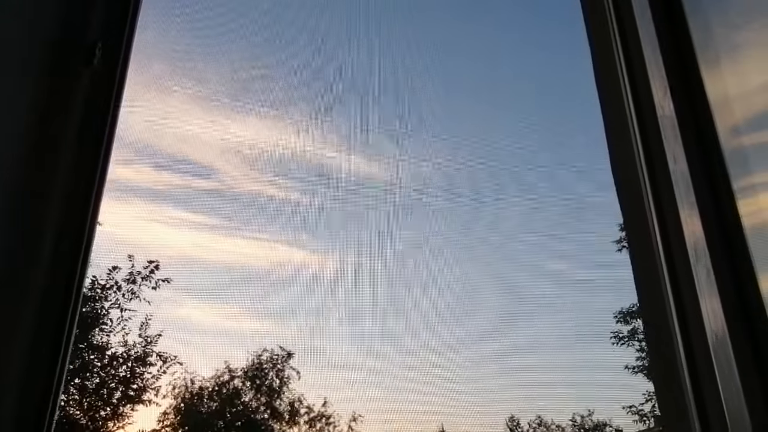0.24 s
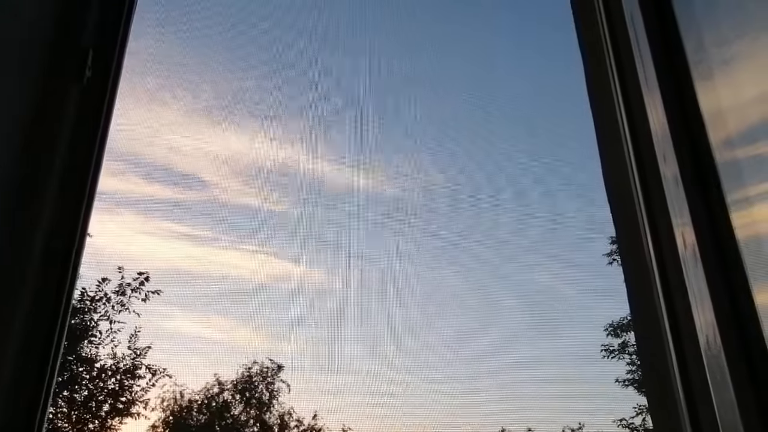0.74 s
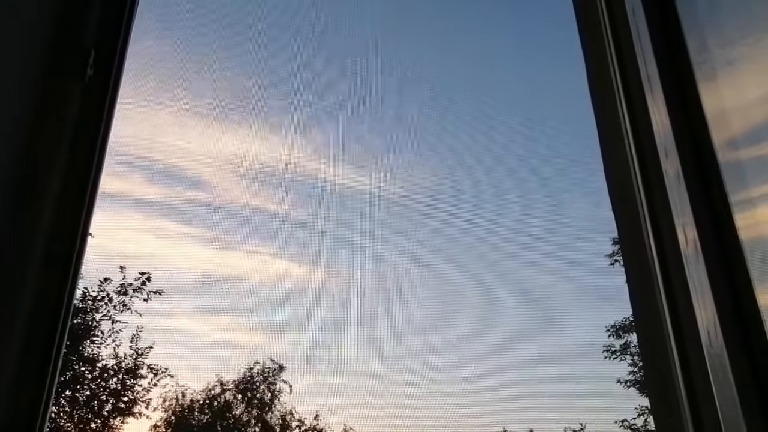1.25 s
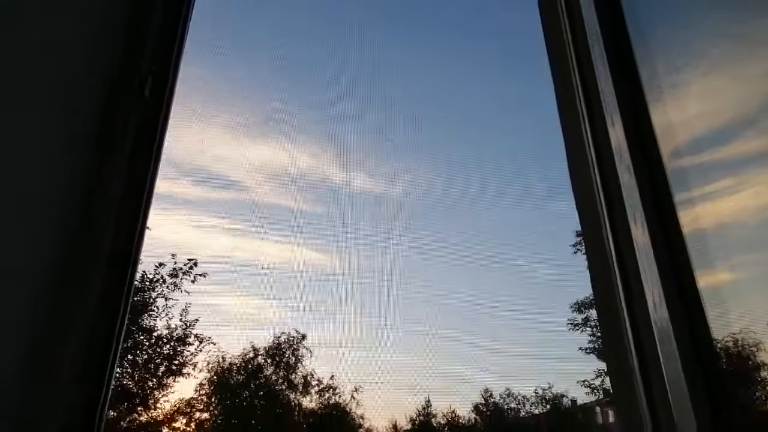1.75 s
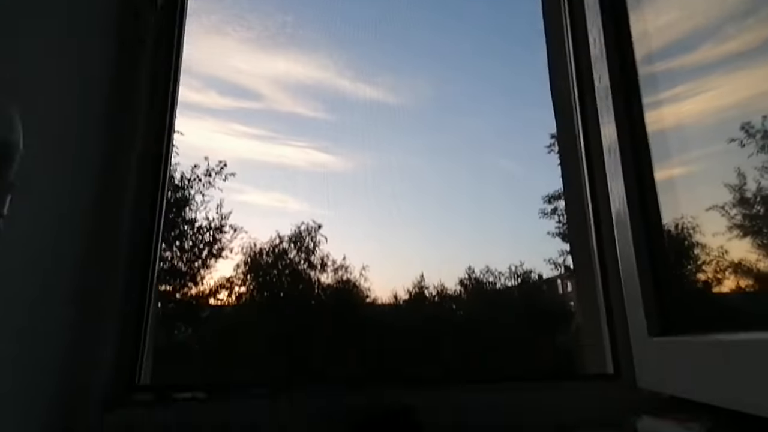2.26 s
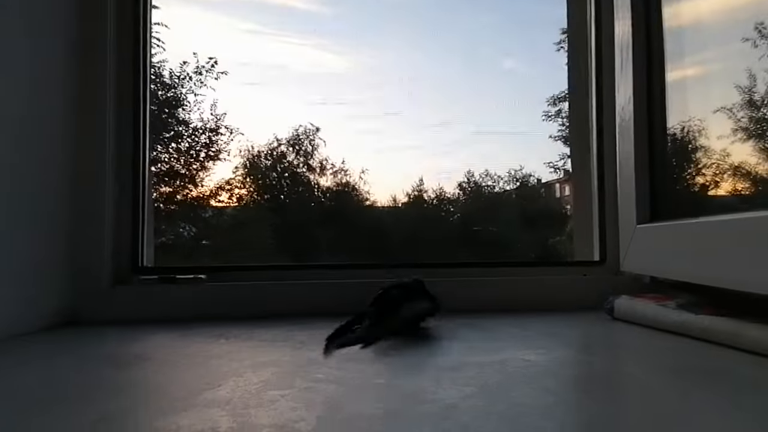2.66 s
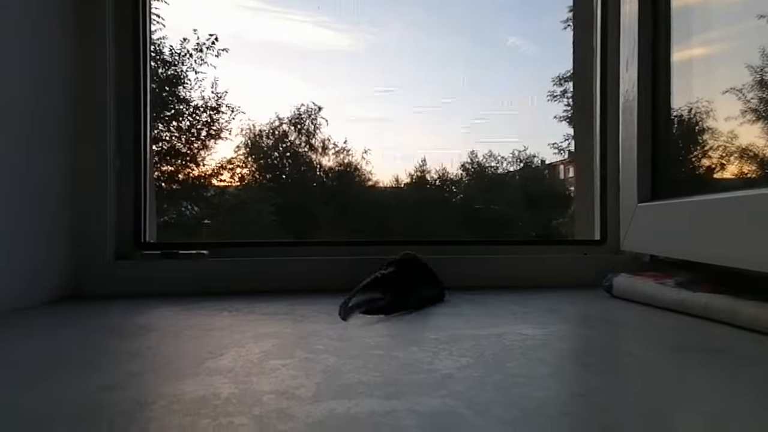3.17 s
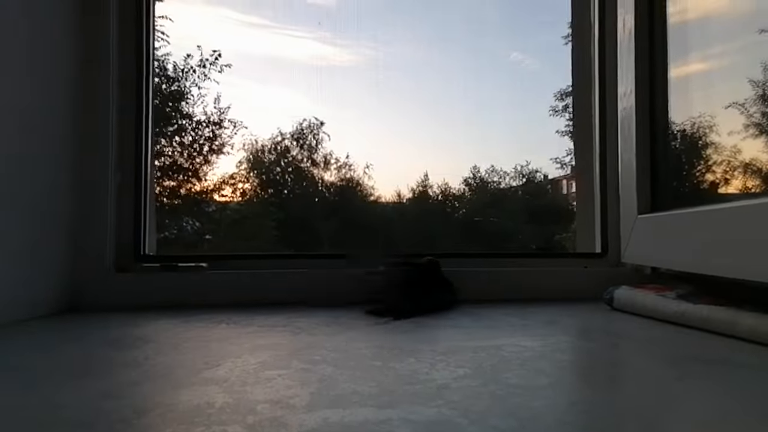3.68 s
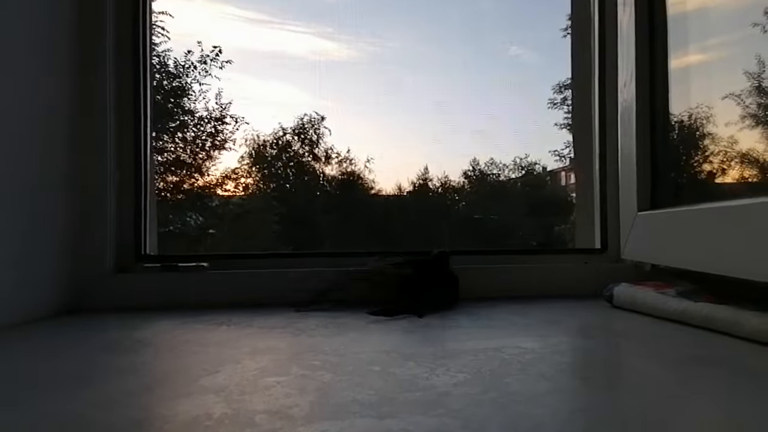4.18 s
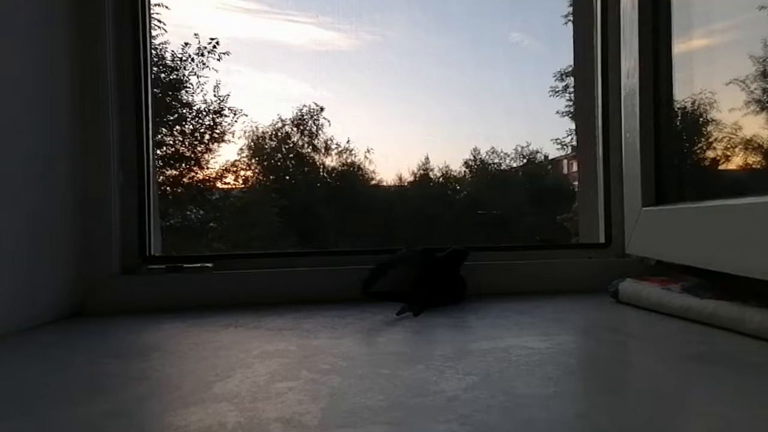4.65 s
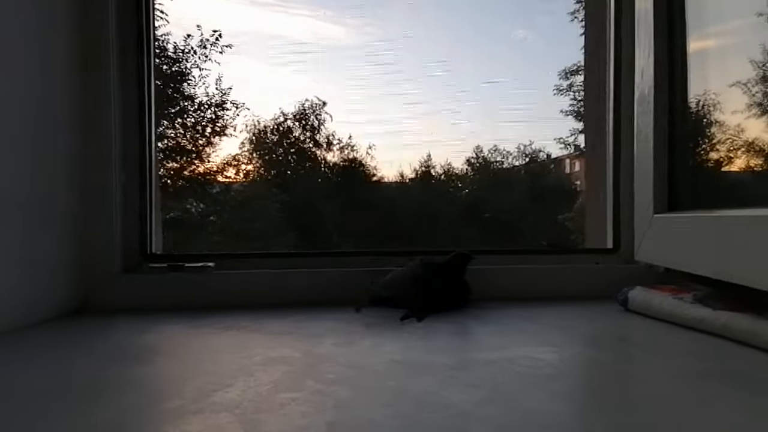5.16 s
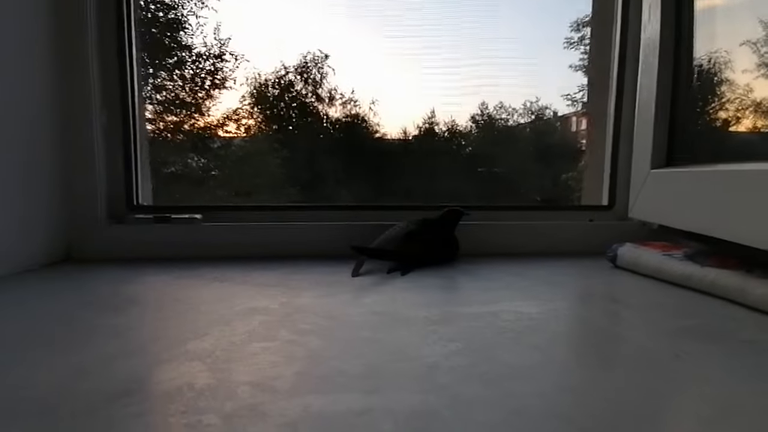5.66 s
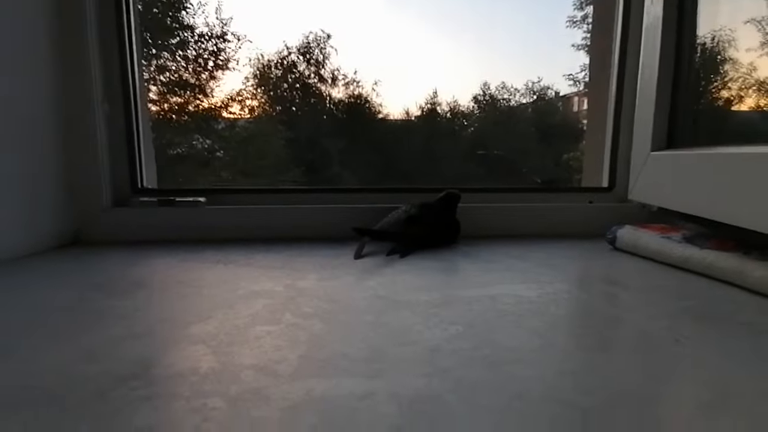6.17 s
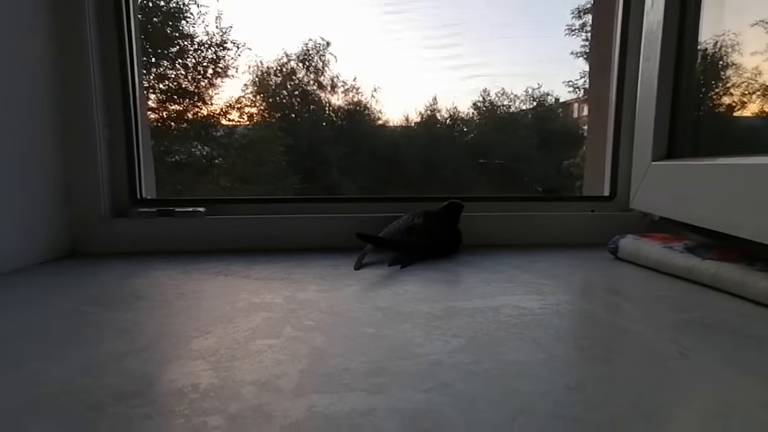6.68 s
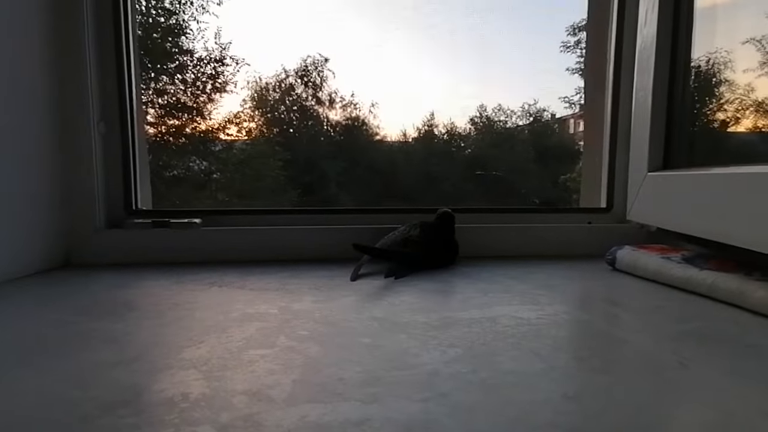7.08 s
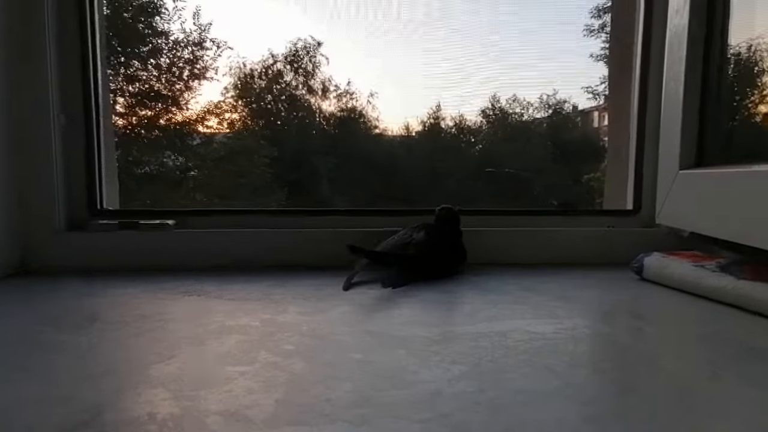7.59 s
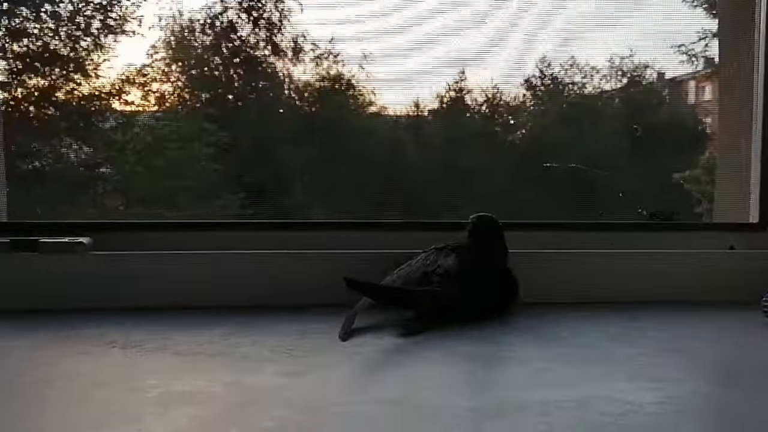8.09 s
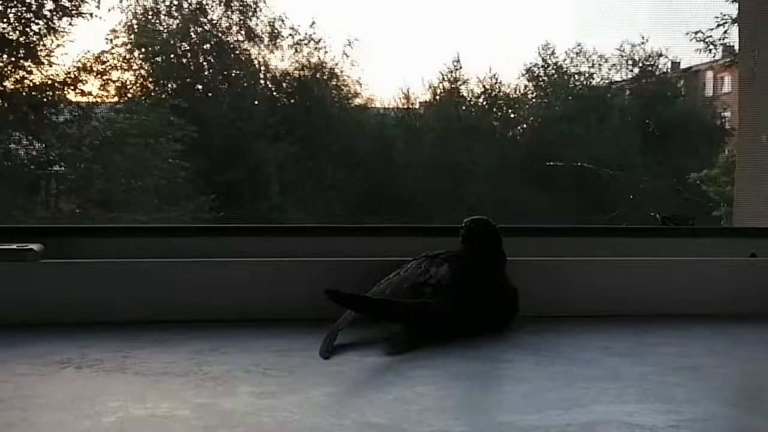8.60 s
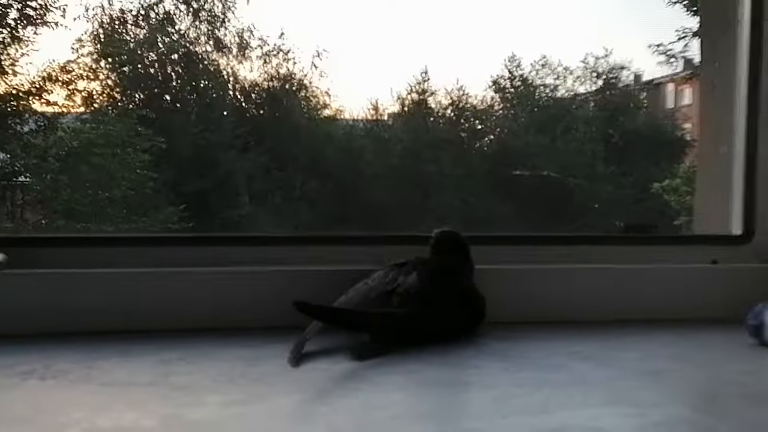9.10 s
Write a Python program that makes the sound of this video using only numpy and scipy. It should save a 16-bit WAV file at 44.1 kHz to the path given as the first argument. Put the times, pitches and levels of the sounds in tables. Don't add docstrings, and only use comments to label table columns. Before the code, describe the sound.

Swifts scream shrilly past an open window in overlapping high whistles, while a grounded bird scuffles on the sill over faint low town hum.

```python
import sys
import numpy as np
from scipy import signal
from scipy.fft import rfft, irfft, next_fast_len
from scipy.io import wavfile
from scipy.ndimage import uniform_filter1d, map_coordinates

SR = 44100
rng = np.random.default_rng(int(sys.argv[2]) if len(sys.argv) > 2 else 0)


def dump_mix(stems):
    frames = np.atleast_2d(stems).T
    limited = np.clip(frames, -1, 1)
    pcm = np.round(limited * 32767).astype(np.int16)
    wavfile.write(sys.argv[1], SR, pcm)


def makeup_ratio(level_db):
    decades = np.asarray(level_db, float) / 20
    return 10 ** decades


N = 411894


def unit(x):
    return x / np.sqrt(np.mean(np.abs(x) ** 2) + 1e-20)


def along(points, hz):
    f, v = np.transpose(points)
    return np.interp(np.log(hz + 1), np.log(f + 1), v)


def curves(rows):
    s, *cols = np.transpose(rows)
    return [np.interp(np.arange(N) / SR, s, c) for c in cols]


def wobble(rate, size=N):
    knots = rng.standard_normal(int(size * rate / SR) + 4)
    return map_coordinates(knots, [np.arange(size) * rate / SR])


def filtered(x, response):
    m = next_fast_len(N + SR // 2)
    return irfft(rfft(x, m) * response(np.fft.rfftfreq(m, 1 / SR)), m)[..., :N]


def sides(db):
    g = makeup_ratio(np.array([db / 2, -db / 2]))
    return g / np.sqrt(np.mean(g ** 2, axis=0))


def band(centre_hz, width_hz):
    return lambda hz: np.exp(-.5 * ((hz - centre_hz) / width_hz) ** 2)


# (frequency [Hz], level [dB per Hz])
TOWN_COLOUR = [(30, -10.5), (60, -20), (100, -6.5), (200, -14.5), (434, -16), (740, -24), (1500, -29.5),
               (2000, -31), (2900, -36), (3700, -42.5), (4300, -43), (7500, -38), (9100, -44),
               (14700, -44.5), (16000, -39)]
# (time [s], level [dB])
TOWN_LEVEL = [(0.0, -63.5), (1.61, -64.5), (8.3, -63), (8.6, -63), (9.34, -62.5)]
# (frequency [Hz], likeness [-1 to 1])
TOWN_LIKENESS = [(40, 0.36), (90, 0.58), (290, 0.97), (640, 0.46), (1400, -0.27), (4000, 0.24),
                 (15000, -0.12)]
# (frequency [Hz], left-right difference [dB])
TOWN_LEAN = [(30, -1), (100, 9.5), (400, 1.5), (700, 4.5), (2400, 0.5), (15000, 3)]


def traffic():
    def mix(hz):
        turn = np.arccos(np.clip(along(TOWN_LIKENESS, hz), -1, 1)) / 2
        return makeup_ratio(along(TOWN_COLOUR, hz)) * [np.cos(turn), np.sin(turn)]

    mid, side = filtered(rng.standard_normal((2, N)), mix)
    hiss = unit(filtered(np.array([mid + side, mid - side]), lambda hz: sides(along(TOWN_LEAN, hz))))
    return makeup_ratio(curves(TOWN_LEVEL)[0] + 4.5 + .8 * wobble(3.3)) * hiss


# (time [s], low drone level [dB], high drone level [dB])
DRONE_LEVELS = [(0, -64, -67), (1.602, -67.5, -69.5), (2.3, -56.5, -66.5), (3.3, -60.5, -56),
                (4.0, -63, -63), (4.601, -59.5, -54.5), (5.4, -59.5, -60), (6.2, -52, -60.5),
                (6.9, -61, -66.5), (7.8, -51, -69), (8.6, -59, -67.5), (9.3, -51.5, -79)]


def drones():
    t, out = np.arange(N) / SR, 0
    for hz, db in zip((91, 129), curves(DRONE_LEVELS)):
        tone = np.sqrt(2) * np.sin(2 * np.pi * hz * t + 1.73 * wobble(3))
        blur = unit(filtered(rng.standard_normal(N), band(hz, 19.0)))
        out = out + makeup_ratio(db) * (0.88 * tone + 0.36 * blur)
    return sides(4.5)[:, None] * out


# (time [s], left-right difference [dB])
BEARING = [(0, -7), (.45, -10), (.6, 8), (.75, -10.5), (1.6, -18), (2.0, -2), (2.5, -10), (3.0, -20),
           (3.4, -11), (3.9, -21), (4.2, -21), (4.8, -1), (5.5, -1.5), (5.9, 8), (6.3, 14), (7.2, -1),
           (8.0, 4.5), (9.3, -7)]


def bearing_db(at):
    return np.interp(at, *np.transpose(BEARING))


# (time [s], level [dB])
FLOCK_LEVEL = [(0, -60), (.9, -44), (2, -43), (3.3, -58), (4.5, -47), (5.85, -70), (6.3, -46), (6.6, -54.5),
               (7.1, -47.5), (8.9, -52.5), (9.34, -56)]
# (middle time [s], half length [s], centre [Hz], level [dB])
HIGH_VOICES = [
    (0, 0.18, 6560, -55),
    (0.69, 0.18, 6800, -69.5),
    (1.38, 0.15, 6150, -49.5),
    (1.58, 0.045, 6400, -52.5),
    (4.888, 0.089, 6800, -71),
    (6.427, 0.29, 6030, -54.5),
    (6.744, .16, 6730, -63.5),
    (7.66, 0.15, 6300, -63),
    (8.714, 0.086, 6260, -62),
]


def flock():
    t = np.arange(N) / SR
    flutter = makeup_ratio(2.4 * wobble(140) + 1.6 * wobble(45))

    def voices(shape):
        hiss = filtered(rng.standard_normal((2, N)), shape)
        return unit(hiss * np.roll(flutter, rng.integers(N)))

    out = makeup_ratio(curves(FLOCK_LEVEL)[0] - 12.0) * voices(band(5476, 457))
    for s, half, hz, db in HIGH_VOICES:
        out = out + makeup_ratio(db) * np.exp(-((t - s) / half) ** 4) * voices(band(hz, 460))
    return sides(bearing_db(t) * 0.32) * out


def walls(x):
    t = np.arange(SR // 2) / SR
    decay = makeup_ratio(-60 * t / .07) + makeup_ratio(-12 - 60 * t / .4)
    tail = rng.standard_normal((2, len(t))) * decay * (t > .003)
    return signal.fftconvolve(x, tail / np.linalg.norm(tail[0]), axes=1)[:, :N]


# (frequency [Hz], level [dB per Hz])
FEATHER_COLOUR = [
    [(1000, -26.5), (2500, -15.5), (3700, -18), (6500, -14), (8500, 2.5), (10500, -8.5), (13000, -20),
     (16000, -18)],
    [(1000, -25), (3500, -19), (5500, -3), (7200, 3), (9500, -15), (12500, -13), (14500, -9), (16000, -20)],
]


def sill_colour(hz):
    return makeup_ratio(np.array([along(port, hz) for port in FEATHER_COLOUR]))


def effort(rows):
    t, levels = np.arange(N) / SR, []
    for s, db, rise, fall in rows:
        before = t < s
        steepness = np.where(before, 1.36, 0.82)
        levels.append(db - 20 * np.abs((t - s) / np.where(before, rise, fall)) ** steepness)
    return np.max(levels, axis=0)


# (strongest time [s], level [dB], rise over 20 dB [s], fall over 20 dB [s])
WING_STROKES = [(1.581, -61, 0.061, 0.29), (1.756, -59, 0.045, 0.12), (1.931, -46.5, 0.056, 0.12),
                (2.19, -62.5, 0.15, 0.07), (2.435, -71.5, 0.22, 0.28), (2.5, -68.5, .2, 0.84),
                (2.7, -51, 0.052, .14), (2.8, -63, .1, .04), (2.92, -74, 0.18, 0.055),
                (3.07, -78, 0.31, 0.52), (3.175, -54, 0.034, 0.081), (3.33, -70.5, 0.37, 0.12),
                (1.38, -73, 0.065, 0.36), (1.505, -65.5, 0.022, 0.18), (3.422, -63, 0.052, 0.43),
                (3.78, -60, 0.06, 0.073), (3.705, -50, 0.048, 0.083), (4.066, -57.5, 0.0065, 0.088),
                (4.146, -60.5, 0.14, 0.16), (4.21, -61.5, .1, 0.036), (5.535, -79, .02, .08),
                (6.1, -75, 0.033, .1)]
# (strongest time [s], level [dB], rise over 20 dB [s], fall over 20 dB [s])
BREAST_SCRAPES = [
    (1.59, -72, 0.037, 0.21),
    (1.94, -93, .05, .1),
    (2.44, -61, 0.022, 0.052),
    (2.7, -89, 0.042, 0.17),
    (3.165, -64, .025, .12),
    (3.27, -68.5, 0.11, 0.31),
    (3.44, -86, .05, 0.16),
    (3.705, -68, 0.048, 0.19),
    (4.07, -62, 0.0087, 0.078),
    (4.15, -66.5, 0.045, 0.14),
]


def feathers():
    grains = rng.standard_normal((2, N)) + 0.56 * rng.standard_normal(N)
    grains = grains * makeup_ratio(2.8 * wobble(900) + 1.4 * wobble(90))
    z = signal.stft(grains, nperseg=256)[2]
    patches = uniform_filter1d(rng.standard_normal(z.shape[1:]), size=7, axis=0)
    patches = unit(uniform_filter1d(patches, size=8, axis=1))
    grains = signal.istft(z * makeup_ratio(3 * patches), nperseg=256)[1][:, :N]
    drag = makeup_ratio(effort(WING_STROKES) + 7.5) * unit(filtered(grains, sill_colour))
    return drag + makeup_ratio(effort(BREAST_SCRAPES)) * unit(filtered(grains, band(2610, 510)))


# (time [s], peak level [dB], body under 8 kHz [dB])
CLAW_TAPS = [(1.0844, -72, -20), (1.1616, -62, -15), (1.1936, -56, -20), (1.206, -62, -20),
             (1.3557, -57, -14), (1.403, -46.5, -16), (1.4984, -65, -10), (1.795, -50, -11),
             (2.325, -79, -10), (2.4394, -54.5, 8.5), (2.5116, -64, -4), (2.5216, -58, -2),
             (3.0404, -72, -8), (3.496, -57, -15), (4.0625, -48, 7), (4.0716, -58, 8), (4.085, -64, 0),
             (4.102, -71, -5), (4.139, -62, -10), (4.1484, -54, -14), (4.154, -52, 5), (4.218, -55, -8),
             (4.6567, -69, -8), (5.332, -70, 10), (5.528, -72, 14), (5.9344, -71, 0), (6.094, -66, 13),
             (6.2177, -65, -20)]


def claws():
    taps, t = np.zeros((2, 2, N)), np.arange(600) / SR
    crack = makeup_ratio(-60 * t / 0.004) + makeup_ratio(-10.5 - 60 * t / 0.052)
    for s, peak_db, body_db in CLAW_TAPS:
        level = makeup_ratio(peak_db + 16.5 + np.array([[[0]], [[body_db]]]))
        taps[..., round(s * SR):][..., :600] += level * crack * rng.standard_normal((2, 600))

    def split(hz):
        body = 1 / (1 + (hz / 7800) ** 8)
        return sill_colour(hz) ** 0.55 * [[1 - body], [body - band(0, 500)(hz)]]

    return filtered(taps, split).sum(axis=0)


# (time [s], length [s], level [dB])
HAND_BUMPS = [
    (2.1462, .0025, -39),
    (6.972, .001, -54),
    (7.9154, .0004, -54),
]


def bumps():
    t, push = np.arange(N) / SR, 0
    for s, length, db in HAND_BUMPS:
        u = np.clip((t - s) / length, 0, None)
        push = push + makeup_ratio(db) * (u > 0) * (1 - u) * np.exp(-u)
    return filtered(push, band(0, 1300))


# (first time [s], last time [s], chips [count], first pitch [Hz], level [dB])
CHIP_RUNS = [(1.427, 1.539, 5, 5250, -56.5), (1.785, 1.855, 4, 6250, -54), (2.256, 2.302, 4, 5760, -50),
             (2.493, 2.54, 3, 5760, -45), (2.965, 3.017, 6, 5500, -45.5), (3.038, 3.05, 1, 4350, -67),
             (3.144, 3.168, 2, 5500, -52.5), (3.192, 3.22, 2, 5200, -55.5), (3.23, 3.335, 5, 5550, -55.5),
             (3.621, 3.72, 8, 5970, -44.5), (3.733, 3.765, 3, 5300, -52), (3.862, 3.88, 1, 5370, -52),
             (3.96, 4.037, 4, 5640, -51), (4.501, 4.564, 6, 5500, -49.5), (4.58, 4.59, 1, 4450, -70),
             (4.654, 4.751, 5, 5750, -57), (4.897, 4.944, 3, 5730, -53.5), (4.97, 4.985, 2, 4930, -66),
             (5.17, 5.198, 2, 5450, -61), (5.259, 5.332, 4, 5800, -58.5), (5.575, 5.623, 3, 5550, -58.5),
             (5.766, 5.82, 3, 5980, -59), (6.088, 6.161, 4, 5450, -50.5), (6.173, 6.225, 2, 5040, -68),
             (6.175, 6.198, 2, 5760, -53), (6.219, 6.3, 5, 5730, -50), (6.575, 6.65, 5, 5850, -56),
             (6.656, 6.72, 5, 5100, -60), (6.876, 6.929, 3, 5780, -57.5), (6.904, 6.969, 5, 5600, -58),
             (7.265, 7.319, 3, 5220, -56), (7.409, 7.504, 5, 5840, -54), (7.775, 7.88, 5, 5790, -56),
             (8.399, 8.44, 4, 5400, -53.5), (8.45, 8.5, 4, 4230, -63)]


def chips():
    out, t = np.zeros((2, N)), np.arange(-400, 400) / SR
    sweep_hz_per_s, half_s = 42000, .004
    for first, last, count, first_hz, db in CHIP_RUNS:
        pan = sides(bearing_db(first - .25))[:, None]
        fall_hz = 457 - 13 * max(db + 46.0, 0)
        for done in np.linspace(0, 1, round(count)):
            hz = first_hz - fall_hz * done ** 1.55
            pip = np.exp(-(t / (half_s * (1 - 0.14 * done))) ** 4)
            pip = pip * (1 + 0.31 * np.cos(2 * np.pi * 250 * t + rng.uniform(0, 2 * np.pi)))
            pip = pip * np.sin(2 * np.pi * (hz - sweep_hz_per_s / 2 * t) * t)
            at = round((first + (last - first) * done) * SR) - 400
            out[:, at:at + 800] += pan * makeup_ratio(db + 5 - 4 * done) * pip
    return out


# (time [s], noise share [0-1])
HOARSENESS = [(0, .28), (.9, .28), (1.04, .08), (1.1, .33), (1.5, .25), (1.7, .12), (2.3, .17), (2.6, .07),
              (6.1, .06), (6.5, .09), (7.8, .16), (8.15, .2), (8.25, .3), (9.34, .3)]
# (scream start [s], overtone level [dB])
FACING = [
    (.582, -27),
    (.716, -24),
    (5.336, -25.5),
    (5.921, -22),
    (6.923, -27),
]
LEAD_S = .01


def scream(s, length, top_hz, rise, db, start_hz, bend, onset_db, peak, arch_db):
    n = round((length + LEAD_S) * SR)
    t, done = np.arange(n) / SR, np.arange(n) / n
    left = t[-1] - t

    def waver(rate):
        return wobble(rate, size=SR)[:n]

    since = (t - LEAD_S) / rise
    below = np.exp(-np.clip(since, 0, None) ** bend) - np.clip(since, -.2, 0)
    pitch = top_hz - (top_hz - start_hz) * below - 125 * done ** 6 + 20 * waver(70)
    turn = 2 * np.pi * np.cumsum(pitch + 35 * waver(16)) / SR
    beat = 2 * np.pi * np.cumsum(275 - 35 * done + 12 * waver(23.4)) / SR

    share = np.interp(s, *np.transpose(HOARSENESS)) * (.5 + done)
    rasp = (waver(520) + 1j * waver(520)) / np.sqrt(2)
    upper = makeup_ratio(-16 + 14 * done ** 1.4) * np.exp(1j * beat)
    weak = makeup_ratio(-30 + 12 * done) * np.exp(2j * beat) + makeup_ratio(-31 + 12 * done) * np.exp(-1j * beat)
    voice = (np.sqrt(1 - share) + np.sqrt(share) * rasp) * (1 + upper + weak) * np.exp(1j * turn)

    facing = sum(makeup_ratio(over_db - 120 * (done - .32) ** 2) for at, over_db in FACING if abs(at - s) < .004)
    over = facing * (((0.77 + rasp) * np.exp(1.49j * turn)).real + 0.24 * np.sin(2 * turn))

    level = makeup_ratio(db - onset_db * below ** 2 - arch_db * (done - peak) ** 2 + 3.5 + 2.2 * waver(24.15))
    pulse_hz = 46.3 * rng.uniform(0.8, 1.51)
    level = level * makeup_ratio(-2.5 * done ** 3 * (1 + np.cos(2 * np.pi * pulse_hz * left)))
    edge = np.clip(np.minimum(t / .008, left / .018), 0, 1)
    return level * edge * (voice.real + over)


# (start time [s], length [s], top pitch [Hz], rise [s], level [dB])
SCREAMS = [(0.078, 0.38, 6300, 0.02, -59.5), (.483, 0.14, 5670, 0.093, -54),
           (.725, 0.14, 5840, 0.055, -51.5), (0.582, 0.18, 5560, 0.023, -52.5),
           (.846, 0.19, 5550, 0.015, -54.5), (1.038, 0.045, 5780, 0.024, -48),
           (1.094, .33, 5460, 0.033, -52.5), (1.448, 0.051, 5600, .02, -65),
           (1.548, 0.057, 5830, 0.019, -49), (2.004, 0.14, 5700, 0.032, -47.5),
           (2.154, 0.15, 6000, 0.036, -49), (2.525, 0.099, 5530, 0.12, -58),
           (2.797, 0.04, 5260, 0.015, -54), (3.344, 0.42, 6280, 0.09, -51.5),
           (3.752, 0.08, 5450, 0.019, -58), (3.972, 0.38, 5960, 0.021, -43.5),
           (4.182, 0.35, 5780, 0.021, -55), (4.324, 0.34, 5570, 0.063, -48.5),
           (4.8, 0.12, 5650, 0.04, -67), (4.993, 0.29, 5810, 0.024, -54.5),
                (5.336, 0.28, 5970, 0.051, -56.5), (5.884, 0.11, 5790, 0.022, -53),
                (5.896, 0.3, 5930, 0.085, -51), (5.921, 0.15, 5730, 0.059, -44),
                (6.196, 0.06, 5700, 0.021, -60), (6.253, 0.11, 5300, 0.023, -67),
                (6.378, 0.115, 5850, 0.045, -55), (7.043, 0.18, 5830, 0.036, -45.5),
                (7.183, 0.2, 5866, 0.073, -46.5), (7.457, 0.35, 6400, 0.052, -58.5),
                (7.527, 0.21, 5680, 0.081, -58), (7.955, 0.045, 5320, 0.014, -60),
                (7.938, 0.33, 5784, 0.11, -48.5), (8.02, 0.35, 5810, 0.045, -55),
                (8.213, 0.19, 5450, 0.083, -60), (8.483, 0.056, 5200, 0.013, -63),
                (8.52, 0.5, 6060, 0.092, -62.5), (8.586, 0.33, 5340, 0.05, -62.5),
                (9.129, 0.25, 5940, 0.073, -64), (9.167, 0.24, 5660, 0.093, -65),
                (9.242, 0.12, 4970, 0.03, -68)]
PICKUPS = [(0.002, 0.086, 6610, 0.0051, -50.5), (1.61, 0.2, 6490, 0.061, -50),
           (1.855, 0.26, 5994, 0.075, -43), (1.92, 0.11, 5470, 0.044, -45), (1.965, 0.27, 5305, 0.012, -49),
           (2.055, 0.19, 6480, .005, -57), (2.835, 0.099, 5540, 0.035, -55),
           (2.3, 0.051, 5920, 0.009, -49.5), (8.8, 0.23, 5850, 0.042, -64.5),
           (2.048, 0.29, 6130, 0.01, -49.5), (4.552, 0.37, 6145, 0.075, -52),
           (4.935, 0.1, 5690, 0.0058, -64), (5.454, 0.33, 6093, 0.052, -49.5),
           (7.014, 0.44, 6070, 0.19, -53)]
SWELLS = [
    (.452, 0.33, 6370, 0.015, -52.5),
    (0.716, 0.23, 6390, 0.044, -47.5),
    (1.036, 0.365, 6410, 0.062, -44),
]
GLIDES = [
    (.178, 0.26, 5760, 0.024, -62.5),
    (1.725, 0.17, 5790, 0.076, -49),
    (6.488, 0.39, 6130, 0.35, -55.5),
    (7.85, 0.083, 4730, 0.024, -62),
]
LEAPS = [
    (2.866, .27, 5800, 0.076, -44.5),
    (3.628, .34, 5955, .03, -47),
    (4.608, .29, 5930, 0.042, -56),
    (6.92, .33, 5557, .03, -48.5),
]
ENTRIES = [
    (1.045, 0.15, 6700, 0.049, -56),
    (2.312, 0.2, 5950, .022, -45),
    (2.6, .34, 6100, .22, -49.5),
    (3.368, 0.43, 6340, 0.032, -45.5),
    (6.305, 0.38, 5670, 0.022, -53),
    (7.882, .24, 5900, .022, -57.5),
]


def screams():
    out = np.zeros((2, N + 2 * SR))
    # (rows, start pitch as a share of the top or 0 for the bottom of the voice, bend of the rise,
    #  onset [dB] fainter, loudest point as a share of the length, fall away from it [dB])
    kinds = [(SCREAMS, 0, .85, 17, 0.3, 19),
             (PICKUPS, .9, .85, 9, 0.3, 19),
             (SWELLS, 0, .85, 17, 0.78, 23.5),
             (GLIDES, 0, .85, 11, 0.43, 23),
             (LEAPS, .7, .6, 25, 0.3, 19),
             (ENTRIES, .83, .7, 9, 0.39, 11)]
    for rows, first, *shape in kinds:
        for s, length, top_hz, rise, db in rows:
            call = scream(s, length, top_hz, rise, db, first * top_hz or 4400, *shape)
            at = round((s + 1 - LEAD_S) * SR)
            out[:, at:at + len(call)] += sides(bearing_db(s))[:, None] * call
    return filtered(out[:, SR:SR + N], lambda hz: 1 / (1 + (4300 / (hz + 1)) ** 27))


def scene():
    birds = screams() + chips()
    birds[1] = np.roll(birds[1], 16)
    sill = feathers() + claws() + bumps()
    return traffic() + drones() + flock() + sill + makeup_ratio(-8.5) * walls(birds) + birds


def low_pass(x):
    return signal.sosfilt(signal.butter(12, 16470, fs=SR, output="sos"), x)


def record(dry):
    mix = filtered(dry, lambda hz: hz < 15800)
    return low_pass(mix)


dry = scene()
out = record(dry)
dump_mix(out)
```